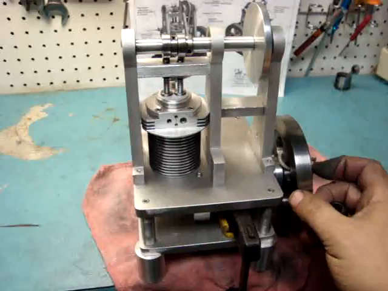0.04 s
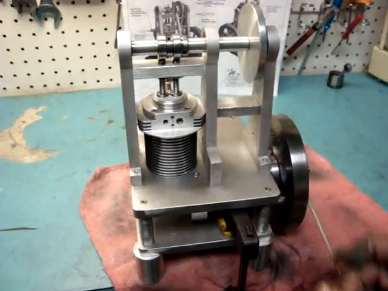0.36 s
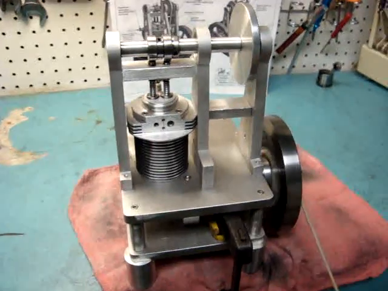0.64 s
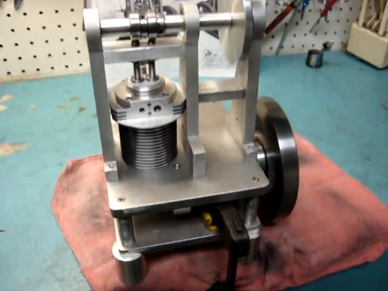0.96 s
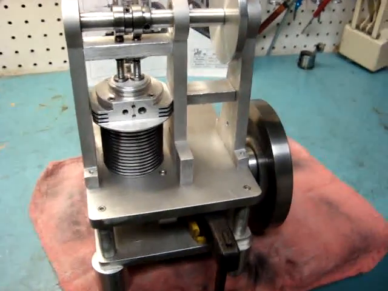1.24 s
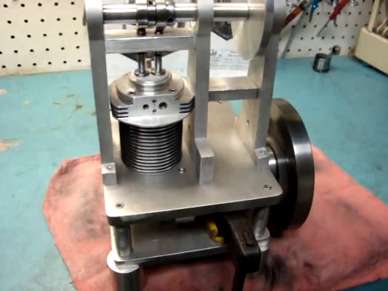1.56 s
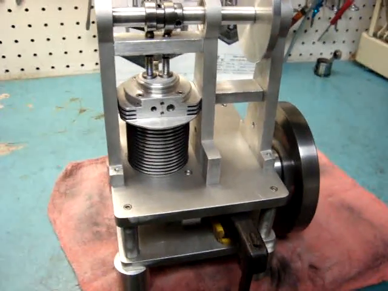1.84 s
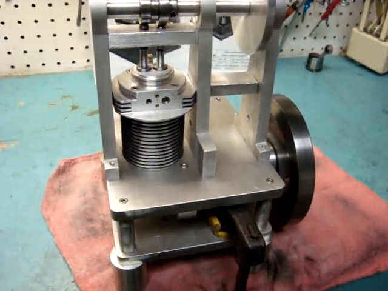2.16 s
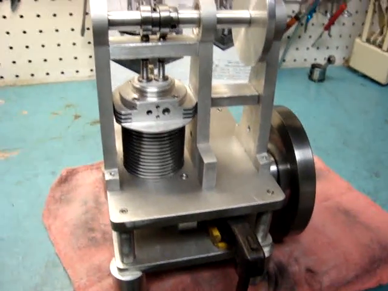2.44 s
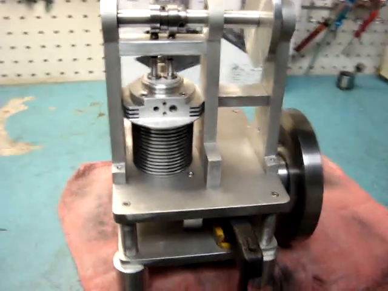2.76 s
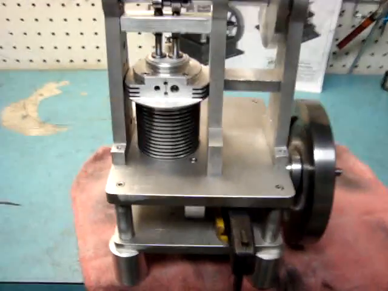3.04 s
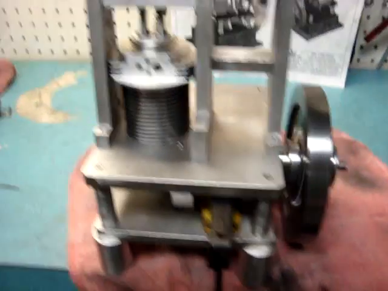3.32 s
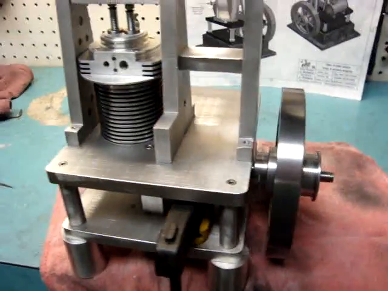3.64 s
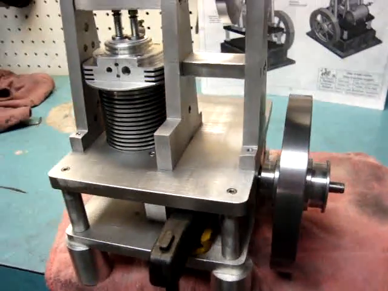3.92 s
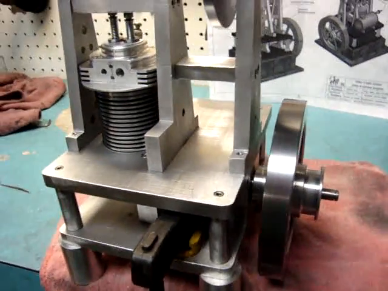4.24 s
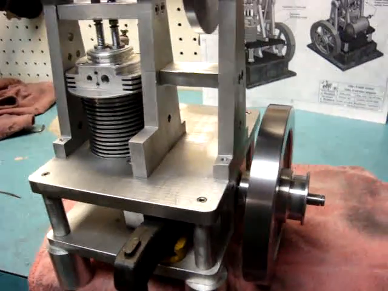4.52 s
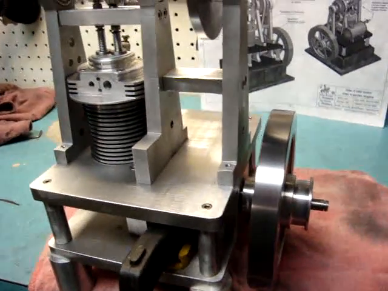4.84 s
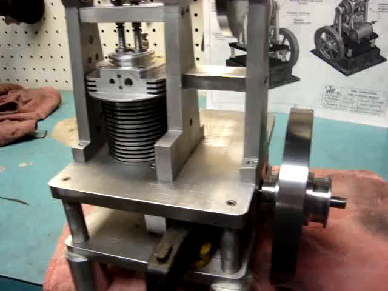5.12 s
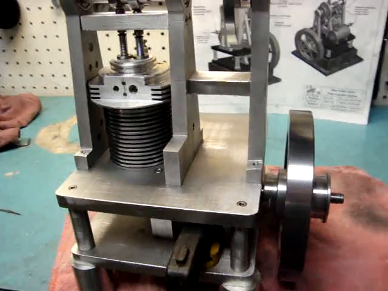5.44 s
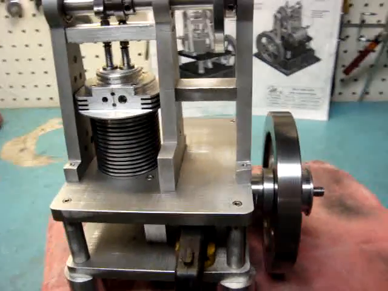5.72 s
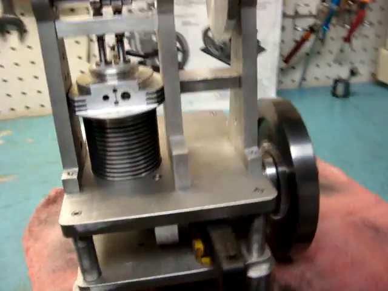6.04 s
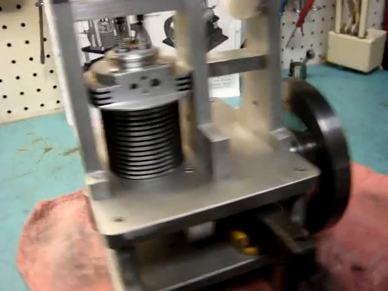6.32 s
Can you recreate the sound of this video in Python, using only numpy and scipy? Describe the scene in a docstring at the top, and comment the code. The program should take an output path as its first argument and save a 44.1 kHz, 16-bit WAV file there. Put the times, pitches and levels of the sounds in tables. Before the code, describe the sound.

Quiet room hiss opens the scene. At about 0.3 seconds a pull cord rubs softly, then tugs, spinning up a small single-cylinder engine on a workbench. Several sharp metal clacks fall between 0.7 and 1 second, when the cord comes free and the flywheel gives a thin, high ring that fades over a couple of seconds. The engine coasts without firing, making rapid hissing puffs of air, alternately stronger and weaker, over a rumble of bearings. The rhythm gradually slows, and the puffs turn more whistly from about 3.5 to 6 seconds. As the speed drops, a light knock on each turn grows harder and the rocking base rumbles more. Dull bumps on the close hand-held microphone come now and then, strongest around 2.5 seconds. Two more metal clacks sound at about 5.2 and 6.2 seconds, with the engine still turning at the end.

```python
"""Over quiet room hiss, a pull cord rubs and tugs, spinning up a small single-cylinder model engine.
Bearings rumble; twice a turn the piston drives a hissing puff of air through the valves.
Metal clacks, the cord comes free near 1 s and the flywheel rings. The engine coasts, unfired:
as it slows, the rod knocks harder and the base rocks on the workbench. The hand-held camera is
bumped now and then from 0.6 s on; two more clacks come near the end."""
import sys
import numpy as np
from scipy import signal
from scipy.fft import rfft, irfft, next_fast_len
from scipy.io import wavfile
from scipy.ndimage import map_coordinates

SR = 44100
rng = np.random.default_rng(int(sys.argv[2]) if len(sys.argv) > 2 else 0)


def persist_wave(psi):
    """Save psi, clipped to +-1, as 16-bit WAV."""
    counts = np.round(np.clip(psi, -1, 1) * 32767).astype(np.int16)
    wavfile.write(sys.argv[1], SR, np.atleast_2d(counts).T)


N = 290178
RELEASE_S = .968  # cord comes free
# spectrum of air rush and piston scrape: freq_hz, level_db
RUSH_SPECTRUM = [(150, -35.5), (350, -23), (550, -3.5), (780, -3.5), (950, 4), (1150, -1), (1350, 2.5),
                 (1820, -1.5), (2030, 1.5), (2500, -1), (3300, -1), (4150, -1), (4800, -10.5), (6000, -34),
                 (9000, -40.5)]


def amp(db):
    """Decibels to gain."""
    return 10 ** (np.asarray(db) / 20)


def unit(x):
    """Scale to rms 1."""
    return x / np.sqrt(np.mean(x ** 2) + 1e-20)


def curves(rows, t):
    """Each column after the time, interpolated at t."""
    times_s, *columns = np.transpose(rows)
    return [np.interp(t, times_s, column) for column in columns]


def swell(t, centre_s, half_s):
    """Smooth rise and fall."""
    return np.exp(-np.abs((t - centre_s) / half_s) ** 3)


def wobble(rate_hz):
    """Smooth random curve, rate_hz knots a second."""
    knots = rng.standard_normal(int(N * rate_hz / SR) + 4)
    return map_coordinates(knots, [np.arange(N) * rate_hz / SR])


def filtered(x, response):
    """Apply a complex frequency response."""
    size = next_fast_len(N + SR // 2)
    return irfft(rfft(x, size) * response(np.fft.rfftfreq(size, 1 / SR)), size)[:N]


def resonance(hz, centre_hz, width_hz):
    """Response of one damped resonance."""
    return 1j * hz * width_hz / (centre_hz ** 2 - hz ** 2 + 1j * hz * width_hz)


def shaped_noise(response):
    """Noise through a response, rms 1."""
    return unit(filtered(rng.standard_normal(N), response))


def noise(spectrum):
    """Noise from (freq_hz, level_db) points, rms 1."""
    freq_hz, level_db = np.transpose(spectrum)
    return shaped_noise(lambda hz: amp(np.interp(np.log(hz + 1), np.log(freq_hz), level_db)))


def band_noise(centre_hz, width_hz, stages=2):
    """Noise through cascaded resonances, rms 1."""
    return shaped_noise(lambda hz: resonance(hz, centre_hz, width_hz) ** stages)


def speed_rps(t, friction_rps_per_s=.3722, drag_s=12.0):
    """Crank speed: pulled up by the cord, then slowed by dry friction and viscous drag."""
    # spin-up by the cord: time_s, speed_rps
    spin_up = [(.3, 0), (.55, 5.57), (.66, 7.99), (.76, 11.1), (.88, 16.6), (.968, 16.935)]
    coast_s = np.maximum(t - RELEASE_S, 0)
    offset_rps = friction_rps_per_s * drag_s
    return (curves(spin_up, t)[0] + offset_rps) * np.exp(-coast_s / drag_s) - offset_rps


def deficit_rps(t):
    """Speed short of 12 rps, at most 3.5; negative when faster."""
    return 12 - np.maximum(speed_rps(t), 8.5)


def crank_times(t, angle_turns):
    """Times at which the crank passes an angle."""
    turns = np.cumsum(speed_rps(t)) / SR - angle_turns
    return np.interp(np.arange(np.floor(turns[0]) + 1, turns[-1]), turns, t)


def room(t):
    """Quiet, slightly wavering hiss."""
    # room background: freq_hz, level_db
    spectrum = [(25, -24), (80, -21.5), (125, -13), (190, -16), (280, -3), (450, 0.5), (720, 6.5),
                (870, -4.5), (980, 4.5), (1400, -3), (2500, -7), (5000, -9.5), (10000, -22.5)]
    return amp(-54.5 + 1.3 * wobble(5.4)) * noise(spectrum)


def cord(t):
    """The cord rubs as it tightens, then shakes base and bench while pulled."""
    # tugs on the base: centre_s, level_db, half_length_s
    tugs = [(0.312, -62, .35), (0.772, -42, 0.038), (0.872, -47.5, 0.19), (0.965, -43, .03)]
    # shaken base: freq_hz, level_db
    tug_spectrum = [(60, -27), (130, -15), (220, -6.5), (290, 0), (340, 2.5), (430, -8), (600, -1),
                    (1000, -8), (2000, -11), (4000, -29)]
    rub = amp(-56) * np.exp(-((t - .31) / .14) ** 4) * band_noise(720, width_hz=240)
    tug = sum(amp(db) * swell(t, s, half_s) for s, db, half_s in tugs) * noise(tug_spectrum)
    # the bench heaves at the hardest part of the pull
    strain = amp(-71) * swell(t, .81, .19) + amp(-53.5) * swell(t, .925, .068)
    heave = strain * noise([(15, -15), (33, -1), (55, -14), (110, -8), (220, -12), (400, -25)])
    # low background rumble, louder in the first second
    early_low_rumble = amp(-64) * swell(t, .59, .51) * band_noise(190, width_hz=360)
    return rub + tug + heave + early_low_rumble


def camera_case(hz):
    """Response of the camera's hollow case."""
    # case resonances: centre_hz, width_hz, gain_db
    modes = [(312, 13, -12), (480, 21, 6), (604, 27, 16), (704, 110, -32), (950, 180, -13.5),
             (1300, 200, -29)]
    return sum(amp(db) * resonance(hz, centre_hz, width_hz) for centre_hz, width_hz, db in modes)


def running_gear(t, gain_db=-53, load_db=2.0, load_turns=.091):
    """Bearings and piston rub: hardest after the strong puff, more loosely as the wheel slows."""
    # bearing rumble: freq_hz, level_db
    bearing_spectrum = [(40, -40.5), (100, -34.5), (200, -27.5), (290, -4.5), (370, -8.5), (460, 4.5),
                        (700, 4.5), (1000, 3), (2000, -8.5), (4000, -18.5), (6000, -48)]
    load = np.cos(2 * np.pi * (np.cumsum(speed_rps(t)) / SR - load_turns))
    onset = np.clip(t / RELEASE_S, 0, 1) ** 4
    level = onset * amp(gain_db + load_db * load + 1.6 * wobble(30))
    rubbing = amp(2 * deficit_rps(t)) * (noise(bearing_spectrum) + amp(-5) * noise(RUSH_SPECTRUM))
    hollow = amp(-3 + 1.2 * deficit_rps(t)) * shaped_noise(camera_case)
    return level * (rubbing + hollow)


def strokes(t, half_s, steepness, weak_db):
    """Air flow: a strong and a weak puff per turn; half_s holds at 15 rps, slower puffs last longer."""
    flow = np.zeros(N)
    lag_turns = .385 + .004 * np.maximum(speed_rps(t), 10)
    for angle_turns, db, stretch in ((0, 0, 1), (lag_turns, weak_db, 1.06)):
        times_s = crank_times(t, angle_turns)
        widths_s = stretch * half_s * (15 / np.maximum(speed_rps(times_s), 4)) ** .6
        scatter = rng.standard_normal((len(times_s), 3))
        for centre_s, width_s, (size, length, lean) in zip(times_s, widths_s, scatter):
            near = slice(max(int((centre_s - 4 * width_s) * SR), 0), int((centre_s + 4 * width_s) * SR))
            offset = (t[near] - centre_s) / (width_s * np.exp(.05 * length))
            flow[near] += amp(db + .74 * size + .9 * lean * offset) * np.exp(-np.abs(offset) ** steepness)
    return flow


def port_noise(centre_hz, width_hz):
    """Turbulence in a narrow band around a port resonance."""
    eddies = lambda: filtered(rng.standard_normal(N), lambda hz: 1 / (1 + (hz / width_hz) ** 2.68))
    phase = 2 * np.pi * centre_hz * np.arange(N) / SR
    return unit(eddies() * np.cos(phase) + eddies() * np.sin(phase))


def valves(t, leak_rps=10.3, side_whistle_db=5, side_fizz_db=-8):
    """Puffs of port whistle, fizz and broad rush; below leak_rps the air leaks away quietly."""
    # loudness and tone of the puffs: time_s, gain_db, side (0 fizzier, 1 more whistle)
    puff_levels = [(.7, -25, 0), (.88, -19.5, 0), (1.06, -22, 0.041), (1.4, -25.5, 0), (2.2, -25.5, 0.16),
                   (2.7, -25.5, 0), (3.2, -25, 0.45), (3.55, -26, 1), (4.4, -26.5, 1), (4.85, -27, 1),
                   (5.85, -25.5, 0.99), (6.3, -23.5, .45), (6.55, -22, 0)]
    # air fizz: freq_hz, level_db
    fizz_spectrum = [(2500, -36), (3400, -4.5), (4200, 1.5), (4850, -4), (5400, 3), (7400, 3), (8200, 5),
                     (8800, 3.5), (9600, 7.5), (10200, -3.5)]
    gain_db, side = curves(puff_levels, t)
    leak_db = -10 * np.log10(1 + (leak_rps / np.maximum(speed_rps(t), 1)) ** 6.5)
    flow = strokes(t, half_s=.0088, steepness=5.0, weak_db=-2.5)
    ports = port_noise(6134, width_hz=687) + amp(-13) * port_noise(9700, width_hz=280)
    whistle = flow * amp(side_whistle_db * side) * ports
    fizz = flow * amp(side_fizz_db * side ** 2) * noise(fizz_spectrum)
    # the rush swells more gently, roughened by the sliding piston
    gentle_flow = strokes(t, half_s=.012, steepness=4.14, weak_db=-3.5)
    rush = amp(-9.5 + .8 * deficit_rps(t) + .9 * wobble(350)) * gentle_flow * noise(RUSH_SPECTRUM)
    flutter_db = 1.5 * np.tanh(wobble(330))  # valve on its seat
    return amp(gain_db + leak_db + flutter_db) * (whistle + fizz + rush)


def workshop(x, wet_db=-7.5, t60_s=.082, cutoff_hz=1690):
    """Add short, dull reflections from bench and walls."""
    age_s = np.arange(SR // 3) / SR
    tail = rng.standard_normal(len(age_s)) * amp(-60 * age_s / t60_s) * (age_s > .003)
    wet = signal.fftconvolve(x, tail / np.linalg.norm(tail))[:N]
    return x + amp(wet_db) * filtered(wet, lambda hz: 1 / (1 + (hz / cutoff_hz) ** 3))


def knocks(times_s, peak_db, rattle, rattle_s):
    """Soft contacts heard through the camera's case, each with a brief rattle."""
    blows = np.bincount((times_s * SR).astype(int), amp(peak_db), N)[:N]
    decay = np.exp(-np.arange(SR // 4) / (rattle_s * SR))
    chatter = signal.fftconvolve(blows, decay)[:N] * rng.standard_normal(N)
    response = lambda hz: camera_case(hz) / (1 + 1j * hz / 1800) ** 2 * (1j * hz / (300 + 1j * hz)) ** 3
    impulse_peak = np.abs(filtered(signal.unit_impulse(N), response)).max()
    return filtered(blows + rattle * chatter, response) / impulse_peak


def camera_bumps(t, rebound_s=.0215, shake_t60_s=.3):
    """Each bump rebounds twice and leaves a short rumble."""
    # dull bumps: start_s, level_db, rebound_loss_db
    bumps = [(.616, -33, 6), (.882, -29, 12), (1.672, -36, 1), (2.434, -23, 1.5), (2.533, -32, 0),
             (2.63, -24.5, 3.5), (5.261, -33, 4)]
    contacts = [(s + k * rebound_s, db - 4.5 - k * loss_db) for s, db, loss_db in bumps for k in range(3)]
    thumps = knocks(*np.transpose(contacts), rattle=.057, rattle_s=.0096)
    shake = sum((t >= s) * amp(db - 17 - 60 * np.maximum(t - s, 0) / shake_t60_s) for s, db, _ in bumps)
    return thumps + shake * band_noise(430, width_hz=360)


def clacks(t):
    """Loose metal struck or scraped: fast-dying noise in one broad resonance."""
    # metal contacts, first four from the cord's end: start_s, level_db, t60_s, centre_hz
    hits = [(.744, -19.5, 0.018, 4000), (0.889, -26.5, 0.033, 2500), (0.958, -20, 0.063, 4200),
            (.976, -29.5, 0.15, 4230), (5.18, -33, 0.17, 2740), (6.186, -22.5, 0.015, 6000)]
    sound = np.zeros(N)
    for start_s, db, t60_s, centre_hz in hits:
        envelope = (t >= start_s) * amp(db - 60 * np.maximum(t - start_s, 0) / t60_s)
        sound += envelope * band_noise(centre_hz, width_hz=.63 * centre_hz, stages=1)
    return sound


def flywheel(t, attack_s=.0057):
    """The rim rings as the cord leaves it."""
    # rim modes: pitch_hz, level_db, t60_s
    modes = [(3190, -32.5, 2), (3252, -38, 3.46), (6450, -31, 0.31), (7920, -26.5, 0.2), (7900, -22, 0.21)]
    age_s = np.maximum(t - RELEASE_S, 0)
    ring = sum(amp(db - 60 * age_s / t60_s + .67 * wobble(14)) * np.sin(2 * np.pi * hz * age_s)
               for hz, db, t60_s in modes)
    return (1 - np.exp(-age_s / attack_s)) * ring


def rocking(t):
    """The base rocks on its cloth; the rumble grows as the wheel slows."""
    onset = np.clip(t - RELEASE_S, 0, 1)
    level_db = -70 + 3.5 * deficit_rps(t) + 1.3 * wobble(19)
    return onset * amp(level_db) * band_noise(255, width_hz=190)


def rod(t, angle_turns=.0501, scatter_db=2.0):
    """Play in the connecting rod knocks once per coasting turn, harder as the wheel slows."""
    times_s = crank_times(t, angle_turns)
    times_s = times_s[times_s > RELEASE_S]
    peak_db = -42 + 1.5 * deficit_rps(times_s) + scatter_db * rng.standard_normal(len(times_s))
    return knocks(times_s, peak_db, rattle=.037, rattle_s=.012)


def scene():
    """Mono mix; only valves and flywheel get reflections."""
    t = np.arange(N) / SR
    engine = workshop(valves(t) + flywheel(t))
    mix = engine + room(t) + cord(t) + clacks(t) + running_gear(t) + rocking(t) + rod(t) + camera_bumps(t)
    return mix[None]


def record(dry):
    """Quick fade-in at 40 ms, then a steep low-pass."""
    cutoff_hz = 10150
    fade_in = np.clip((np.arange(N) / SR - .04) / .005, 0, 1)
    low_pass = lambda hz: amp(-50 * np.clip((hz - cutoff_hz) / 300 + .2, 0, 3))
    return filtered(dry[0] * fade_in, low_pass)[None]


dry = scene()
out = record(dry)
persist_wave(out)
```